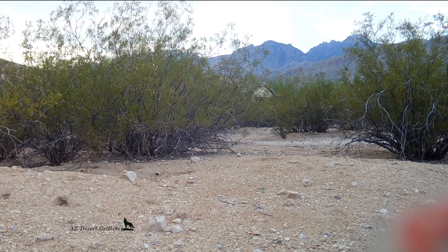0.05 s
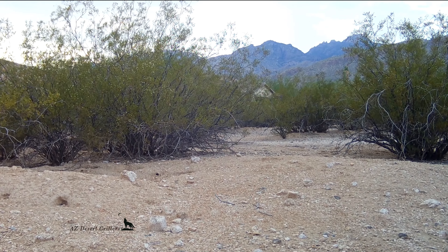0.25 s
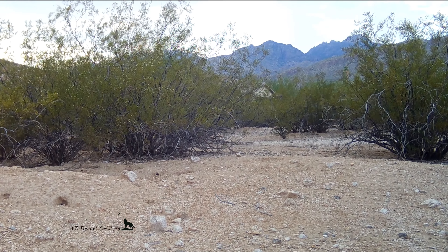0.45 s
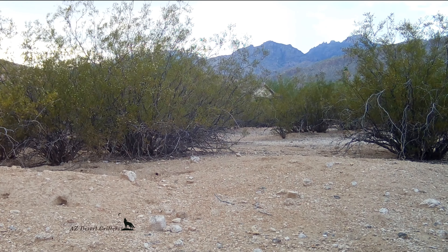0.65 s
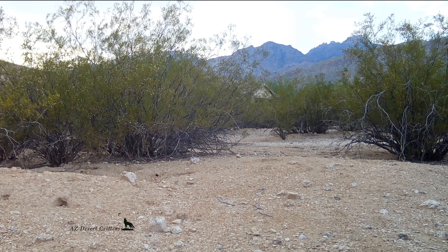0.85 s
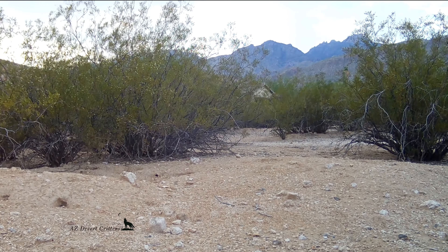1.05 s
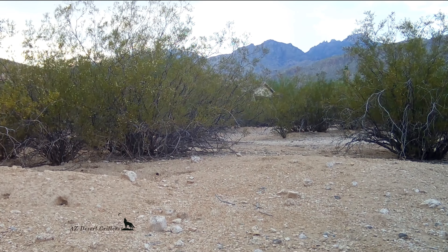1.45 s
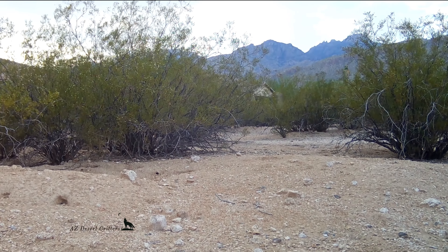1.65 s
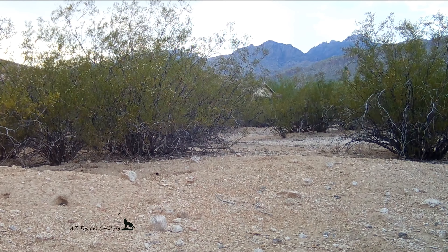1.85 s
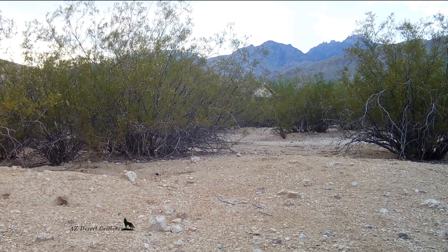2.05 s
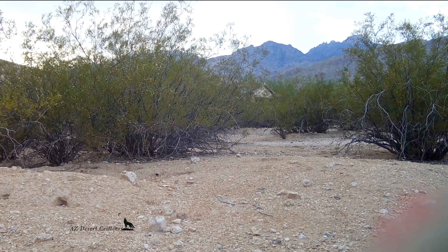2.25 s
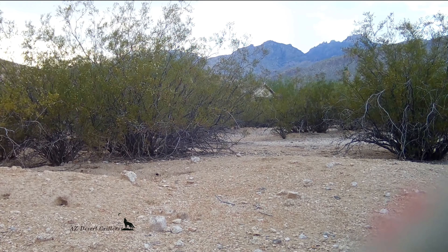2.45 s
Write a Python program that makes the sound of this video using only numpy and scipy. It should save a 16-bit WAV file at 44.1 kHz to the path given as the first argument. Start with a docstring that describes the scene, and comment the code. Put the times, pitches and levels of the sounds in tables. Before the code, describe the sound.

A woodpecker hammers a quick run of sharp, rattling pecks on the housing of an outdoor camera, right at the microphone, then gives a few spaced knocks and scrapes. A distant bird repeats nasal calls in the quiet desert air.

```python
"""Quiet desert air with a thin electronic whine, and a distant bird's arched, nasal calls.
Up close, a woodpecker perched on an outdoor camera ticks and scrapes on the case, then hammers it:
each peck rings the shell, rattles the inner parts and shakes the stand; hard pecks overload the
microphone. Small birds chirp faintly far off, and bushes scatter a short tail after the far voices."""
import sys
import numpy as np
from scipy import signal
from scipy.fft import rfft, irfft, next_fast_len
from scipy.io import wavfile
from scipy.ndimage import map_coordinates

SR = 44100
rng = np.random.default_rng(int(sys.argv[2]) if len(sys.argv) > 2 else 0)


def log_audio(samples):
    """Write samples as a 16-bit WAV file to the path given in sys.argv[1]."""
    # one column per channel
    frames = np.atleast_2d(samples).T
    # limit to full scale, then quantise
    limited = np.clip(frames, -1, 1)
    pcm = np.round(limited * 32767).astype(np.int16)
    wavfile.write(sys.argv[1], SR, pcm)


N = 114660


def amp(db):
    """Decibels to gain."""
    return 10 ** (np.asarray(db) / 20)


def unit(x):
    """Scale to rms 1."""
    return x / np.sqrt(np.mean(x ** 2) + 1e-20)


def along(points, hz):
    """(Hz, value) points read on a log axis."""
    knots_hz, values = np.transpose(points)
    return np.interp(np.log(hz + 1), np.log(knots_hz + 1), values)


def coloured(x, points):
    """x through a (Hz, dB) curve, at rms 1."""
    size = next_fast_len(len(x) + 8192)
    gain = amp(along(points, np.fft.rfftfreq(size, 1 / SR)))
    return unit(irfft(rfft(x, size) * gain, size)[:len(x)])


def wobble(knots_per_s, size):
    """Smooth random curve."""
    return map_coordinates(rng.standard_normal(4096), [np.arange(size) * knots_per_s / SR], mode="wrap")


def add(track, at_s, sound):
    """Mix a sound into the track."""
    i = round(at_s * SR)
    part = sound[max(-i, 0):max(N - i, 0)]
    track[max(i, 0):][:len(part)] += part


def air():
    """Soft, dark noise whose level drifts slightly."""
    # Air spectrum (frequency [Hz], relative density [dB])
    spectrum = [(20, -17), (60, -10.5), (120, -8), (240, -5.5), (400, -2.5), (750, -1.5), (1200, -3),
                (1900, -6.5), (3000, -15), (4600, -26), (5600, -41), (7000, -52), (14800, -51.5),
                (16000, -64.5)]
    level_db = -52.7 + 0.28 * wobble(0.88, N)
    return amp(level_db) * coloured(rng.standard_normal(N), spectrum)


def whine():
    """Thin electronic tone with a jittering pitch."""
    pitch_hz = 7770 + 35 * wobble(900, N)
    return amp(-77.5) * np.sin(2 * np.pi * np.cumsum(pitch_hz) / SR)


def calls():
    """Each nasal call swells as its pitch arches up, and fades as it drops."""
    # Calls (start [s], top [s], end [s], start pitch [Hz], top pitch [Hz],
    # fall exponent [2 round, 3 abrupt], level [dB])
    arches = [(-.1, .03, .118, 850, 948, 3.2, -36.5), (.225, .268, .312, 820, 946, 2.2, -34.5),
              (.795, .835, .87, 745, 870, 2, -41.5), (1.07, 1.205, 1.281, 828, 960, 3.3, -36),
              (1.378, 1.43, 1.48, 735, 942, 1.8, -35), (1.997, 2.03, 2.075, 725, 850, 2, -41),
              (2.3, 2.415, 2.48, 880, 961, 3.8, -34.5), (2.58, 2.63, 2.68, 780, 900, 2, -38)]
    # Harmonics of the voice (multiple, relative level [dB])
    harmonics = [(1, -12), (2, 0), (3, -27), (4, -38)]
    edge_db, jitter, fall_share = -13, .004, .22
    track = np.zeros(N)
    for start_s, top_s, end_s, start_hz, top_hz, exponent, db in arches:
        t = np.arange(start_s, end_s, 1 / SR)
        before_top = np.clip((top_s - t) / (top_s - start_s), 0, 1)
        after_top = np.clip((t - top_s) / (end_s - top_s), 0, 1)
        pitch_hz = top_hz - (top_hz - start_hz) * np.sin(np.pi * before_top / 2) ** 2
        pitch_hz -= top_hz * fall_share * after_top ** exponent
        phase = 2 * np.pi * np.cumsum(pitch_hz * (1 + jitter * wobble(350, len(t)))) / SR
        voice = sum(amp(part_db) * np.sin(round(k) * phase) for k, part_db in harmonics)
        level_db = db + edge_db * (before_top + after_top) ** 3 + 1.5 * wobble(100, len(t))
        add(track, start_s, amp(level_db) * signal.windows.tukey(len(t), .12) * voice)
    return track


def bush_echo(x):
    """The bushes scatter a faint tail after far sounds."""
    echo_db, t60_s = -11, 0.31
    t = np.arange(SR // 2) / SR
    tail = rng.standard_normal(len(t)) * amp(-60 * t / t60_s)
    return x + amp(echo_db) * signal.fftconvolve(x, tail / np.linalg.norm(tail))[:N]


def ticks():
    """A claw or the beak tip clicks on the case and pings one of its resonances."""
    # Light contacts (time [s], relative level [dB], ping [Hz], ping over click [dB])
    contacts = [(0.108, -36.5, 2994, 11), (0.154, -44, 2300, 1), (.3255, -42, 2517, -12),
                (0.527, -42, 1520, -18.5), (1.5119, -27.5, 1134, 16.5), (2.0965, -41.5, 4600, 2),
                (2.2072, -50, 1510, 16.5), (2.2302, -37.5, 1350, 14), (2.241, -39.5, 1535, 16),
                (2.2699, -31, 2370, 5), (2.2971, -18, 1353, 1.5), (2.3031, -19, 1260, 6),
                (2.3252, -19.5, 1530, -2), (2.3536, -47.5, 2850, 20.5), (2.388, -39, 1472, 11.5),
                (2.403, -45, 1437, 10), (2.5783, -37, 1630, -4)]
    # Click spectrum (frequency [Hz], relative density [dB])
    spectrum = [(100, -20), (275, -8), (500, -2), (850, -2.5), (1500, 4), (2500, 2.5), (3400, -4),
                (4700, -2), (5600, -18.5), (6700, -23), (8000, -38), (15000, -50)]
    click_t60_s, ping_t60_s, rise_s = 0.026, 0.024, 0.00056
    t = np.arange(SR // 12) / SR
    attack = 1 - np.exp(-t / rise_s)
    track = np.zeros(N)
    for at_s, db, ping_hz, ping_db in contacts:
        click = coloured(rng.standard_normal(len(t)), spectrum) * amp(-60 * t / click_t60_s)
        ping = amp(ping_db - 60 * t / ping_t60_s) * np.sin(2 * np.pi * ping_hz * t)
        add(track, at_s, 2 * amp(db) * attack * (click + ping))
    return track


def scraping():
    """Tiny slips on the case catch and let go, among brief squeaks, each at its own pitch."""
    # Scrape envelope (time [s], level [dB])
    envelope = [(0.187, -79), (0.199, -41.5), (0.249, -38), (0.324, -45.5), (0.352, -55), (0.406, -43.5),
                (0.442, -68), (.94, -59), (0.963, -44), (1.0, -50.5), (2.0, -89), (2.016, -47),
                (2.081, -43), (2.107, -36), (2.122, -81.5), (2.194, -63.5), (2.212, -37), (2.269, -30.5),
                (2.314, -34), (2.353, -28), (2.39, -35), (2.419, -57.5), (2.567, -87.5), (2.582, -65),
                (2.6, -41)]
    # Slip spectrum (frequency [Hz], relative density [dB])
    spectrum = [(80, -27), (220, -32.5), (275, 4), (350, -16.5), (600, -12), (850, 5), (1100, 0),
                (1500, 1.5), (2050, -2.5), (2450, -2), (3400, -15), (4600, -8.5), (5400, -23.5),
                (6600, -29.5), (7600, -54.5), (15000, -65)]
    slips_per_s, spread_db, catches_per_s, catch_db = 1800, 3, 130, 1.8
    squeaks_per_s, decay_cycles, squeak_hz, range_octaves, squeak_db = 280, 5, 2000, .8, -5
    slips = (rng.random(N) < slips_per_s / SR) * rng.choice([-1, 1], N)
    slips = slips * amp(spread_db * rng.standard_normal(N))
    slips *= amp(catch_db * wobble(catches_per_s, N))
    squeaks = np.zeros(N)
    t = np.arange(SR // 50) / SR
    for k, (shift, detune, size) in enumerate(rng.standard_normal((int(squeaks_per_s * N / SR), 3))):
        cycles = t * squeak_hz * 2 ** (range_octaves * np.tanh(detune))
        grain = np.exp(-cycles / decay_cycles) * (1 - np.exp(-cycles)) * np.sin(2 * np.pi * cycles)
        add(squeaks, (k + shift / 2) / squeaks_per_s, amp(spread_db * size) * grain)
    rub = unit(coloured(slips, spectrum) + amp(squeak_db) * unit(squeaks))
    return rub * amp(np.interp(np.arange(N) / SR, *np.transpose(envelope)))


def ring_envelope(t, hz, db, t60_s):
    """A resonance builds up, the high ones fastest, then dies away."""
    build_s = min(1.4 / hz, .0018)
    return (1 - np.exp(-(t / build_s) ** 2)) * amp(db - 60 * t / t60_s)


def peck(thud_db, knock_db, clack_db, ping_db, edge_db, spot_hz, ring_ratio, shake_db):
    """One blow: the tip cracks; shell, inner parts and stand ring. The spot struck sets the colour."""
    # Crack of the beak tip (frequency [Hz], relative density [dB])
    crack_spectrum = [(500, -12), (5000, -3), (9000, -9), (16000, -10)]
    # Housing modes (frequency [Hz], relative level [dB], t60 [s])
    shell_modes = [(225.7, -16, 0.032), (350, -29.5, 0.011), (521, -19, 0.021), (721, -8.5, 0.016),
                   (844, -6.5, 0.026), (961.5, -15, 0.036), (1310, -19.5, 0.021), (1533, -9.5, 0.029),
                   (1920, -25, 0.026), (2340, -14.5, 0.02), (2874, -12, 0.02), (2988, -12, 0.02),
                   (3494, -21, 0.026), (4320, -18.5, 0.017), (4774, -17.5, 0.015)]
    # Dense rattle of the inner parts (low edge [Hz], high edge [Hz], relative level [dB], t60 [s])
    rattle_bands = [(30.8, 430, -10, 0.024), (639, 1150, -6.5, 0.03), (1156, 1750, -4.5, 0.018),
                    (2110, 2700, -10.5, 0.028), (3650, 4914, -12, 0.021)]
    # Long ring of the stand (frequency [Hz], relative level [dB], t60 [s])
    stand_modes = [(64, -48.5, 1.05), (118, -55, .6), (167, -52, .3), (242, -32.5, .15), (274, -25.5, .17),
                   (770, -27, .09)]
    crack_db, crack_t60_s = -22.5, .009
    colour = [(350, thud_db), (600, knock_db), (950, knock_db), (1250, 0), (1900, 0),
              (2300, clack_db), (2600, clack_db), (2850, ping_db), (3050, ping_db), (3500, edge_db)]
    t = np.arange(SR * 3 // 4) / SR
    sound = coloured(rng.standard_normal(len(t)), crack_spectrum) * amp(crack_db - 60 * t / crack_t60_s)
    for k, (hz, db, t60_s) in enumerate(shell_modes):
        fade = ring_envelope(t, hz, db + along(colour, hz), t60_s * ring_ratio)
        sound += 2 * (-1) ** k * fade * np.sin(2 * np.pi * hz * t)
    # the panel right under the beak
    fade = ring_envelope(t, spot_hz, db=-10.5, t60_s=.026 * ring_ratio)
    sound += 2 * fade * np.cos(2 * np.pi * spot_hz * t)
    for low_hz, high_hz, db, t60_s in rattle_bands:
        hz = (low_hz + high_hz) / 2
        band = [(low_hz / 2, -120), (low_hz, 0), (high_hz, 0), (high_hz * 2, -120)]
        fade = ring_envelope(t, hz, db + along(colour, hz), t60_s * ring_ratio)
        burst = fade * coloured(rng.standard_normal(len(t)), band)
        sound += burst * np.linalg.norm(fade) / np.linalg.norm(burst)
    for hz, db, t60_s in stand_modes:
        sound += amp(db + shake_db - 60 * t / t60_s) * np.sin(2 * np.pi * hz * t)
    return sound


def hammering():
    """The woodpecker's beak strikes the housing, each time at a different spot."""
    # Beak blows (time [s], gain [dB], thud [dB], knock [dB], clack [dB], ping [dB], edge [dB],
    # ring of the struck spot [Hz], ring length [ratio], stand shake [dB])
    blows = [(0.2238, -6.5, 8, 12.5, 2.5, 9, 3.5, 766, 0.92, 7),
             (0.365, -3.5, 1, -3.5, 3.5, -1, 3, 1344, 1.224, 4.5),
             (0.3739, -15.5, 12, -0.5, -5, 1, 6, 1840, 0.68, -6),
             (0.5035, -0.5, 3.5, 0, 0.5, 5, -2, 1580, 1.094, 4),
             (0.51, -10.5, -4, -6, -2.5, -11, 2.5, 2880, 1, 0.5),
             (0.6691, -2.5, 4.5, 4.5, 0.5, 0.5, 2, 850, 1.16, 6),
             (0.832, -2.5, 7.5, 4.5, 1.5, 5, 2, 1570, 1.164, 7.5),
             (0.9844, -0.5, -9, -0.5, -0.5, -8, 0, 1554, 1.77, 1),
             (0.9888, -4.5, 1.5, -9.5, 2.5, 0, -1.5, 1542, 1.15, -10.5),
             (1.0023, -3.5, -5, 1.5, -3, 1, 3, 1568, 1.04, -1),
             (1.5089, -2, 3, -2, 2, -12, 2, 1347, 0.95, -1.5),
             (1.7040, -6, -3, 3.5, 4.5, 6.5, 7, 2560, 0.82, -4),
             (1.7316, -29, -5, 10, -2.5, -1, 10.5, 4100, 0.89, 5),
             (2.2995, -2.5, -13.5, -9, -8.5, -1, 0.5, 4550, 0.51, -2)]
    track = np.zeros(N)
    for at_s, db, *timbre in blows:
        add(track, at_s, amp(db) * peck(*timbre))
    return track


def chirps():
    """Short, hoarse, falling notes of small birds."""
    # Far chirps (time [s], length [s], centre pitch [Hz], level [dB])
    notes = [(0.407, 0.032, 3750, -49), (0.477, 0.072, 3690, -48), (0.536, 0.042, 3600, -55.5),
             (0.702, 0.042, 3720, -60), (0.866, 0.036, 3700, -56), (1.055, 0.0069, 4700, -54.5),
             (1.255, 0.063, 3770, -52), (1.532, 0.026, 3710, -55)]
    fall_share, roughness = .1, .06
    track = np.zeros(N)
    for at_s, length_s, hz, db in notes:
        position = np.linspace(-.5, .5, int(length_s * SR))
        pitch_hz = hz * (1 - fall_share * position + roughness * wobble(1400, len(position)))
        phase = 2 * np.pi * np.cumsum(pitch_hz) / SR
        add(track, at_s, amp(db) * np.cos(np.pi * position) * np.sin(phase))
    return track


def scene():
    """Air and whine, the birds in the bushes, the woodpecker on the camera; mono."""
    near = hammering() + ticks() + scraping()
    far = bush_echo(calls() + chirps())
    return (air() + whine() + far + near)[None]


def record(dry):
    """Hard pecks overload the microphone and flatten; the treble ends steeply at the band limit."""
    limit_hz, slope_width_hz = 16000, 900
    size = next_fast_len(N + 8192)
    hz = np.fft.rfftfreq(size, 1 / SR)
    clipped = np.clip(dry, -1, 1)
    lowpass = np.clip((limit_hz - hz) / slope_width_hz + .5, 0, 1) ** 2
    return irfft(rfft(clipped, size) * lowpass, size)[:, :N]


dry = scene()
out = record(dry)
log_audio(out)
```